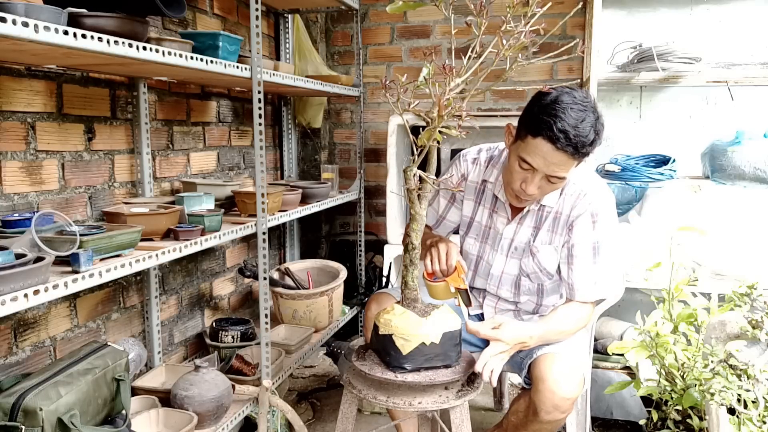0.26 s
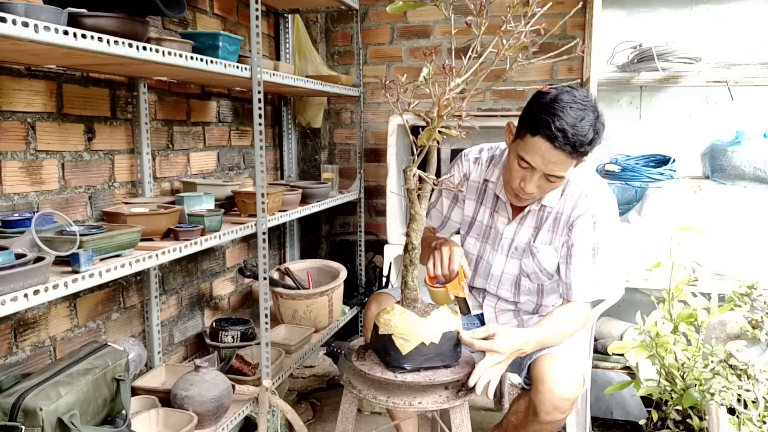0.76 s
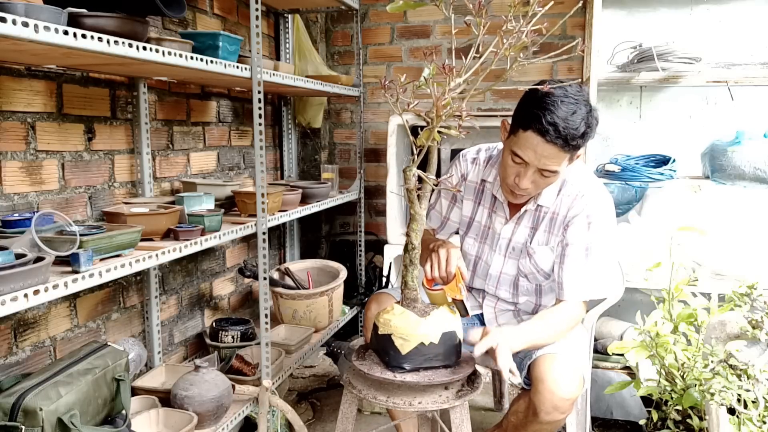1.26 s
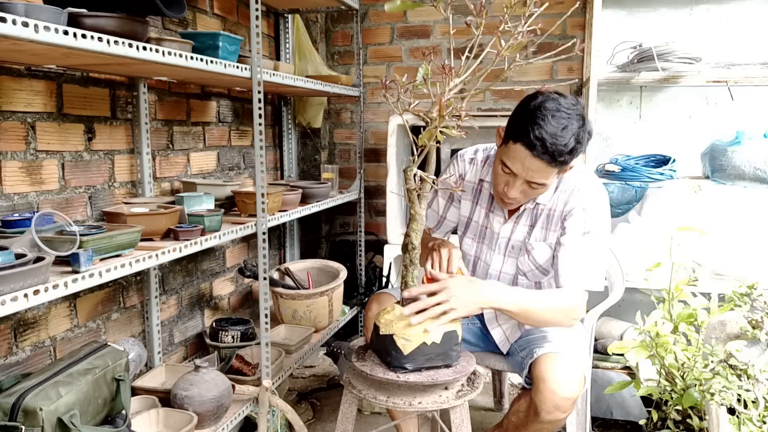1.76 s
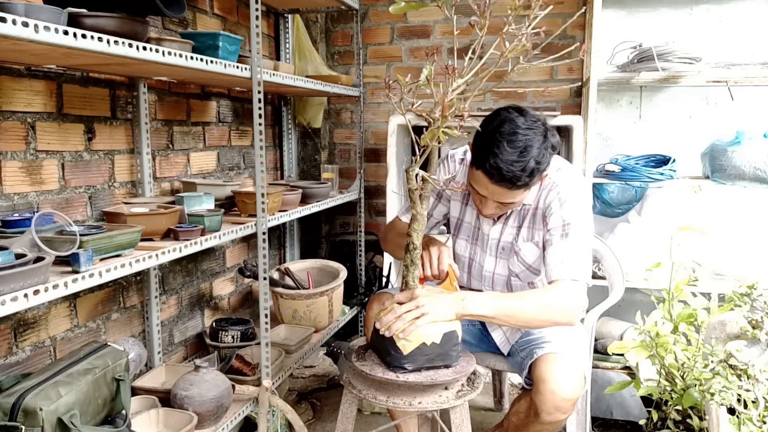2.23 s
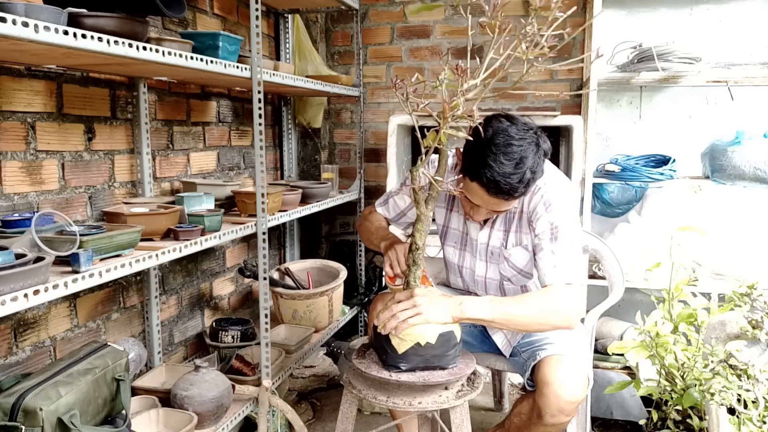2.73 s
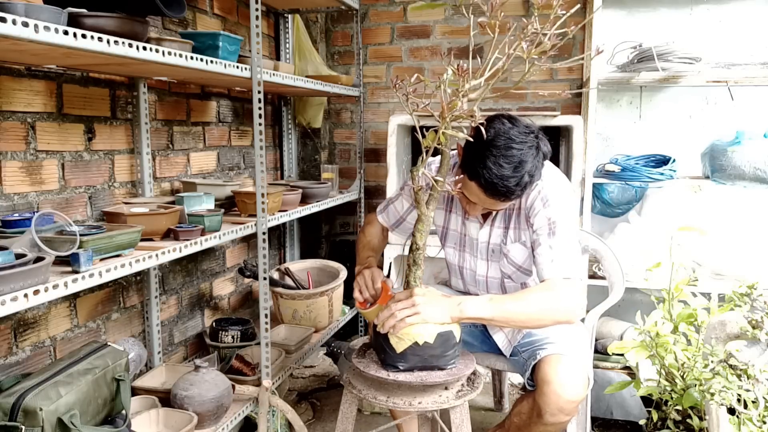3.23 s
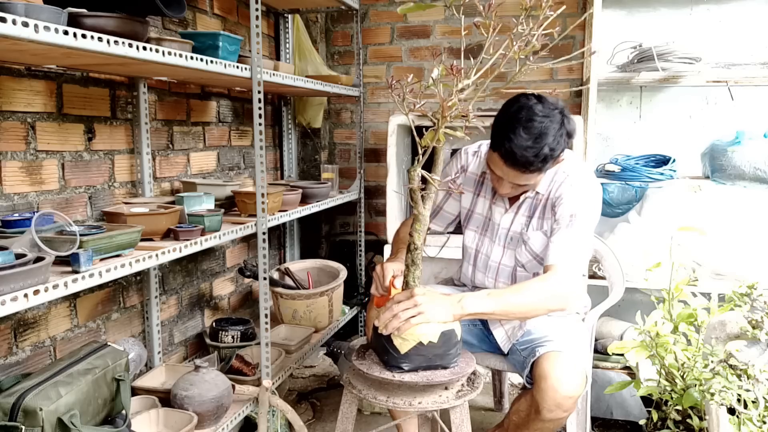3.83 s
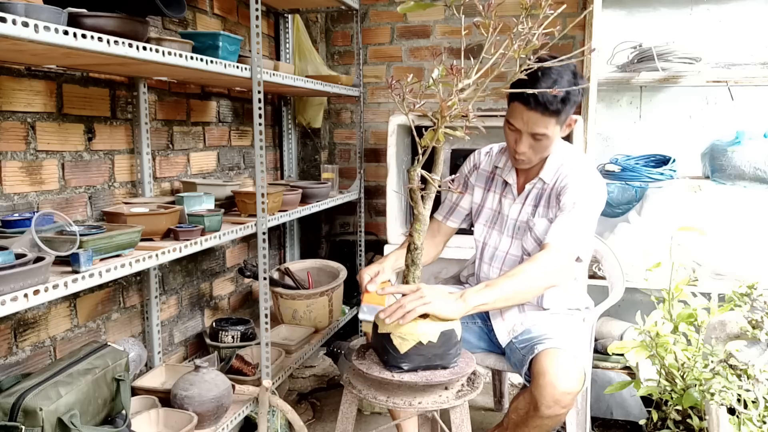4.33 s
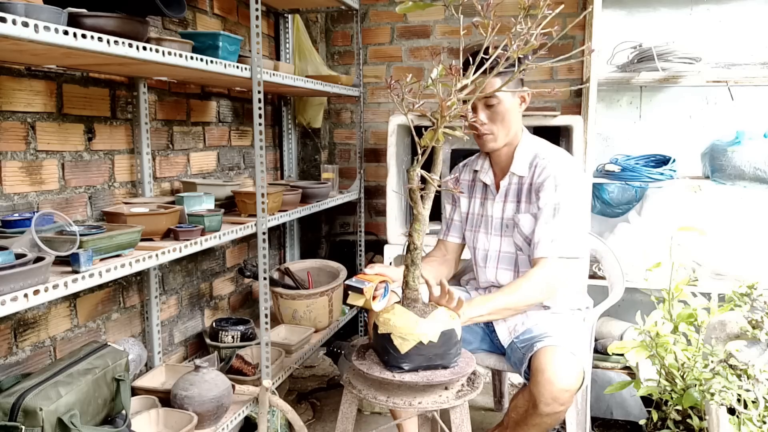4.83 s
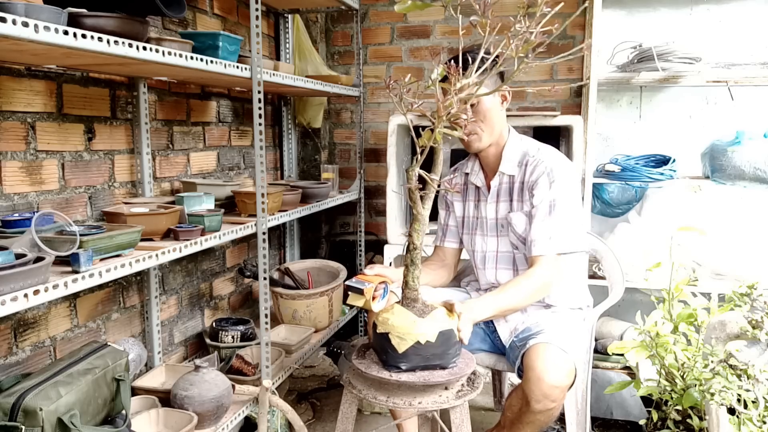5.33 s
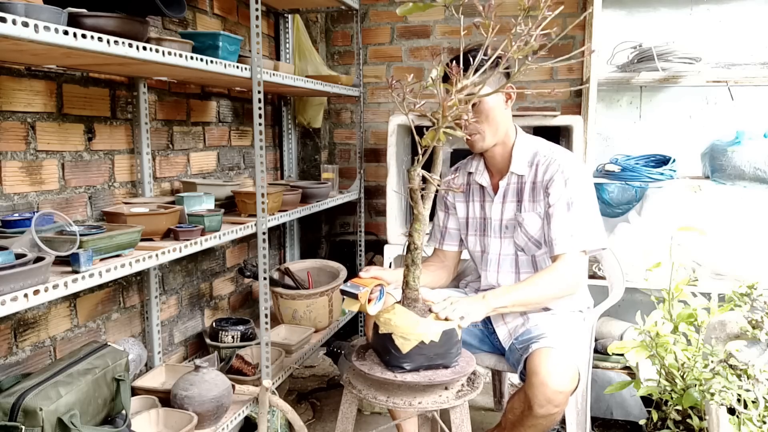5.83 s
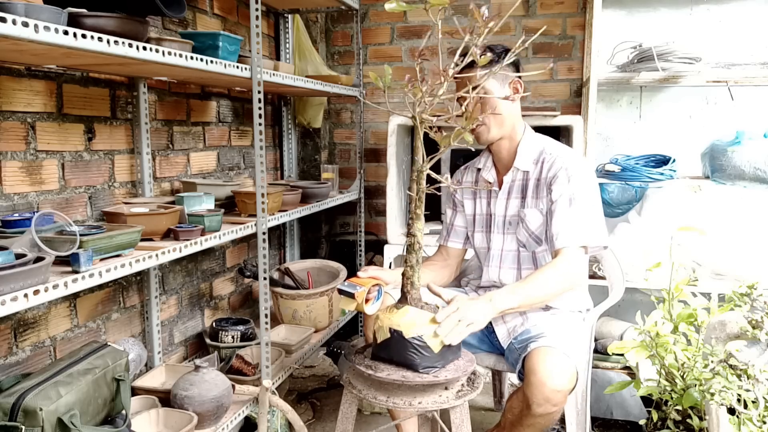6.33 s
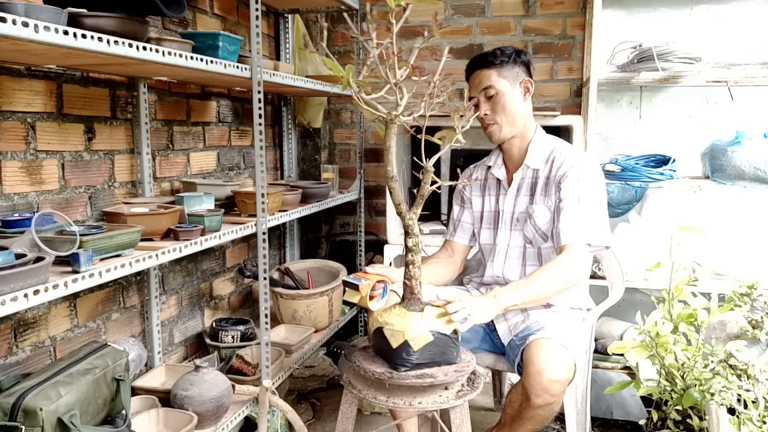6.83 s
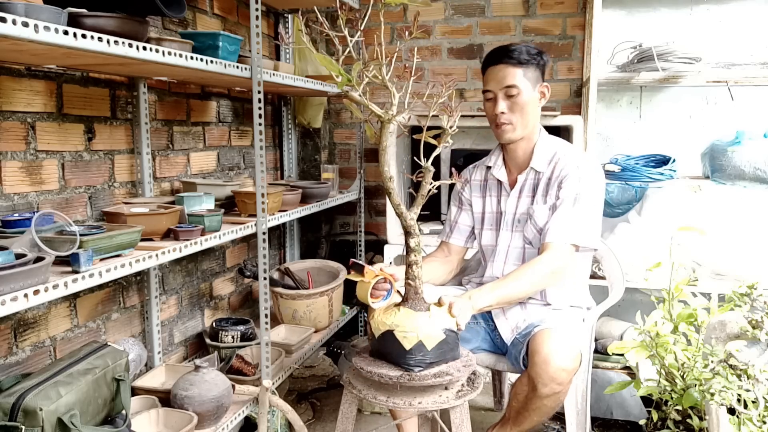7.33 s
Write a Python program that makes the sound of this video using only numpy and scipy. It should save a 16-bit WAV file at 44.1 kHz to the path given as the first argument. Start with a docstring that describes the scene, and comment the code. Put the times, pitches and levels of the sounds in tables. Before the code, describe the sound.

A short tape tug, then a loud stuttering pull of sticky tape, soft plastic crinkles, quiet bird whistles and a faint low engine.

```python
"""In a small brick shed, packing tape is pulled off a hand dispenser and wound round a plastic-wrapped root ball.
The glue lets go in jerks: each slip is a shower of tiny random snaps that rings the taut strip and the roll.
The wrap rustles and crinkles, built from dense fine snaps for the rubbing and sparser ones for crinkles and creases.
Outside, gliding sine tones make bird calls and steady ones faint far-off notes; harmonics of a firing rate make
an engine throb, with puffs and rumble of filtered noise. A soft bed of noise is the outdoor air."""
import sys
import numpy as np
from scipy import signal
from scipy.fft import rfft, irfft, next_fast_len
from scipy.io import wavfile
from scipy.ndimage import uniform_filter1d

SR = 44100
rng = np.random.default_rng(int(sys.argv[2]) if len(sys.argv) > 2 else 0)


def master(y):
    """Save y as 16-bit WAV."""
    cut = np.clip(np.atleast_2d(y).T, -1, 1)
    pcm = np.round(cut * 32767)  # scale
    wavfile.write(sys.argv[1], SR, pcm.astype(np.int16))


N = 333837
TIME = np.arange(N) / SR

# colour of roll and strip in each pull: (frequency [Hz], relative density [dB per Hz])
FIRST_PULL_COLOUR = [(60, -53), (200, -29), (450, -14), (600, -1), (720, -6.5), (880, -16), (1100, -10.5),
                     (1450, -8.5), (2000, -1.5), (2500, -9), (3700, -12), (4800, -17.5), (7500, -19),
                     (10500, -21.5), (15500, -25)]
SECOND_PULL_COLOUR = [(120, -49), (200, -16), (298, -18.5), (399, -1.5), (641, -6), (742, -2.5),
                      (1450, -12), (2470, 1), (2750, -9.5), (3680, -2), (4260, -10), (7090, -12.5),
                      (15500, -25.5)]
LONG_PULL_COLOUR = [(40, -42), (130, -20), (250, -18), (420, -14.5), (520, -12), (620, -19), (760, -3),
                    (1050, -6), (1450, -8), (1850, -2.5), (2700, 1.5), (3700, -3), (7000, -7),
                    (10000, -9.5), (15500, -15)]
LAST_PULL_COLOUR = [(80, -45.5), (250, -24), (400, -8.5), (620, -14), (1000, -13.5), (1500, -8.5),
                    (1800, -6), (2300, -9), (4500, -14.5), (7300, -6.5), (10000, -13.5), (15500, -16)]


def tape(jerks):
    """A short tug, a second one, the long pull round the root ball, a last tug; the grip damps the core in tugs."""
    first = pull("first", FIRST_PULL_COLOUR, jerks, core_db=-21.5)
    second = pull("second", SECOND_PULL_COLOUR, jerks, core_db=-11)
    long = pull("long", LONG_PULL_COLOUR, jerks, core_db=-3.0)
    last = pull("last", LAST_PULL_COLOUR, jerks, core_db=-15)
    return first + second + long + last


# stretches of steady peeling: (pull [name], start [s], stop [s], level [dB])
PEEL_STRETCHES = [("first", .192, .305, -27.5), ("second", 2.531, 2.63, -31), ("long", 2.695, 2.93, -27),
                  ("long", 2.945, 3.385, -28), ("long", 3.428, 3.445, -28), ("long", 3.482, 3.5375, -25),
                  ("last", 4.039, 4.085, -54), ("last", 4.095, 4.13, -34)]
# modes of the hollow cardboard core: (frequency [Hz], width [Hz], relative level [dB])
CORE_MODES = [(758, 97, -19.5), (833, 24, -17.5), (1074, 76, -23.5), (1780, 160, -16)]
PEEL_ATTACK_S = 0.009  # the strip takes up its tension
PEEL_RELEASE_DB_PER_S = 600  # the roll coasts to a stop
SLIP_LIFE_S = 0.0044
STRIP_FLUTTER_RAD = 0.99  # rms unsteadiness of the ringing strip's phase


def pull(name, colour, jerks, core_db, size=8192):
    """Glue threads snap steadily and in jerks; each jerk rings the strip at the pitch of its tension."""
    stretches = [row[1:] for row in PEEL_STRETCHES if row[0] == name]
    peel = np.zeros(N)
    t = TIME[:SR]
    for start, stop, db in stretches:
        onset = 1 - np.exp(-t / PEEL_ATTACK_S)
        overrun_s = np.maximum(t - (stop - start), 0)
        add(peel, start, onset * amp(db - PEEL_RELEASE_DB_PER_S * overrun_s))

    threads = snaps(per_second=7000, scatter_db=3.5)
    force = threads * peel
    flutter = STRIP_FLUTTER_RAD * wobble(600)
    strip = np.zeros(N)
    earliest, latest = stretches[0][0] - .03, stretches[-1][1] + .03
    for s, db, hz, ring_db in jerks:
        if not earliest < s < latest:
            continue
        now = slice(round(s * SR), round(s * SR) + size)
        onset_s = s - .001  # each slip starts 1 ms before its listed time
        shower = burst(SLIP_LIFE_S, rise=0.00036) * threads[now]
        add(force, onset_s, amp(db + 3) * shower)
        ring = burst(SLIP_LIFE_S, rise=0.00014) * np.sin(2 * np.pi * hz * TIME[:size] + flutter[now])
        add(strip, onset_s, amp(db + ring_db) * ring)

    core = sum(amp(db + core_db) * resonate(force, hz, width) for hz, width, db in CORE_MODES)
    no_bass = signal.butter(4, 550, "highpass", fs=SR, output="sos")  # the ringing strip and core carry no bass
    return coloured(force, colour) + signal.sosfilt(no_bass, strip + core)


# single hard jerks of the tape: (time [s], relative level [dB], strip pitch [Hz], strip ring over jerk [dB])
SINGLE_JERKS = [(.1953, -18, 2060, -6), (.2257, -17, 2299, -8), (.2316, -11.5, 2677, 1.5),
                (.2479, -12.5, 1970, -2.5), (.2773, -12.5, 1940, -2), (.2989, -17.5, 1943, 1.5),
                (2.5362, -20.5, 1876, -0.5), (2.543, -20, 1920, 2), (2.5619, -16.5, 1980, -7),
                (2.5864, -16, 2530, -3), (2.612, -17, 2440, -9.5), (2.6959, -15, 2620, 1),
                (2.7826, -15.5, 2660, -12), (3.2885, -10.5, 2410, 8), (3.3131, -10.5, 2860, -1),
                (3.3324, -14.5, 1830, -2), (3.3702, -12.5, 2860, -12.5), (3.4306, -11.5, 2230, -10.5),
                (3.482, -12.5, 2970, -13), (3.5064, -10, 2315, -12), (4.0378, -39, 3260, -3),
                (4.0995, -21.5, 1830, -12), (4.117, -25, 1760, 1)]
# under a firm pull the glue sticks and slips in a run:
# (start [s], length [s], slips [per s], relative level [dB], strip pitch [Hz], strip ring over slip [dB])
CHATTER_RUNS = [(2.831, .09, 36, -15.5, 2748, -10), (2.945, .115, 45.4, -13, 2870, -2),
                (3.0707, .11, 38.5, -11.5, 2800, 4), (3.2036, .07, 34, -9.5, 2570, -7)]
SLIP_JITTER_S, SLIP_SCATTER_DB, PITCH_SCATTER = 0.0005, 1, 0.018  # rms; pitch as a share


def slips():
    """List every slip as (s, dB, Hz, ring dB): the single jerks and the nearly regular runs of chatter."""
    rows = list(SINGLE_JERKS)
    for start, length, rate, db, hz, ring_db in CHATTER_RUNS:
        chance = rng.standard_normal((16, 3))
        for s, (late, louder, higher) in zip(np.arange(start, start + length, 1 / rate), chance):
            slip_s = s + SLIP_JITTER_S * late
            slip_db = db + SLIP_SCATTER_DB * louder
            slip_hz = hz * (1 + PITCH_SCATTER * higher)
            rows.append((slip_s, slip_db, slip_hz, ring_db))
    return rows


# creases of the wrap giving way: (time [s], level [dB], life [s])
CREASE_TIMES = [(2.219, -52, 0.014), (2.247, -40, 0.024), (2.413, -33.5, 0.013), (4.335, -59.5, 0.017),
                (4.413, -43.5, .025), (4.449, -47.5, 0.027), (4.719, -54.5, 0.037), (5.906, -49.5, .014)]
# colours of the wrap giving way, rubbed and crinkled: (frequency [Hz], relative density [dB per Hz])
GIVING_COLOUR = [(150, -29), (400, -7.5), (900, 4), (1800, 0.5), (3300, -2), (7000, -7), (15000, -14.5)]
RUB_COLOUR = [(120, -28), (200, -4.5), (503, -19.5), (610, -7), (899, -2.5), (1210, -7), (1680, -3.5),
              (2260, -13.5), (2550, -10.5), (7000, -29), (9100, -48.5), (15400, -120)]
CRINKLE_COLOUR = [(1500, -14.5), (3000, 5.5), (5500, 4), (9000, 1), (15500, -6.5)]


def wrap(rubbing, crinkling):
    """Rubbed plastic rustles, crinkles finely and gives at creases; the roll bumps as it is lifted away."""
    rub_grain = snaps(per_second=8200, scatter_db=4.5) * amp(2.0 + 0.89 * wobble(20))
    rub = coloured(rub_grain * rubbing, RUB_COLOUR)
    crinkle_grain = snaps(per_second=840, scatter_db=9.5) * amp(3.5 + 3.0 * wobble(24))
    crinkle = coloured(crinkle_grain * crinkling, CRINKLE_COLOUR)

    giving, bump = np.zeros(N), np.zeros(N)
    for s, db, life in CREASE_TIMES:
        add(giving, s, amp(db) * burst(life, rise=0.00062))
    creases = coloured(giving * snaps(per_second=1200, scatter_db=2.5), GIVING_COLOUR)

    core_tone = np.sin(2 * np.pi * CORE_MODES[0][0] * TIME[:8192])
    add(bump, 4.443, amp(-38) * burst(life=0.011, rise=0.0019) * core_tone)
    return rub + crinkle + bump + creases


# swells of rubbing, crinkle and hiss; the short one at 6.14 s is hiss let through by the suppressor
# during a whistle, written in here as a swell of its own:
# (peak time [s], swell [s], fade [s], relative rubbing [dB], relative crinkle [dB])
RUSTLE_SWELLS = [(0.601, .1, .15, -68, -68.5), (1.15, .2, 0.25, -74.5, -72.5), (1.68, .42, 0.56, -57, -74),
                 (1.705, .02, 0.023, -65.5, -64), (3.75, .1, 0.23, -66, -71.5), (4.33, .12, .1, -68, -66),
                 (4.7, .2, 0.18, -67, -66.5), (5.9, 0.76, 0.67, -81, -74), (6.14, .02, 0.0554, -75, -74)]


def rustle_swells():
    """Rubbing and crinkling strength: every swell rises and fades much like a bell curve."""
    rub, crinkle = np.zeros(N), np.zeros(N)
    for s, swell, fade, rub_db, crinkle_db in RUSTLE_SWELLS:
        shape = np.exp(-np.abs((TIME - s) / np.where(TIME < s, swell, fade)) ** 1.5)
        rub += amp(rub_db) * shape
        crinkle += amp(crinkle_db) * shape
    return rub, crinkle


# stereo spread of the work: (frequency [Hz], gain of the side signal [dB])
WORK_WIDTH = [(100, -9), (350, -2.5), (750, -12.5), (1300, -2), (3000, 1.5)]
# the work leans right, except in its highest fizz: (frequency [Hz], left gain over right [dB])
WORK_LEAN = [(100, -3.5), (350, -3), (1200, -5), (2800, -4), (5500, -2), (9000, 0), (15000, 2.5)]
# echoes of the shed's walls: (frequency [Hz], time to fall 60 dB [s])
SHED_DECAY = [(200, 0.25), (1400, 0.2), (4000, 0.24), (12000, 0.18)]
# echoes of the open yard, for the work and the birds: (frequency [Hz], time to fall 60 dB [s])
YARD_DECAY = [(500, .55), (3000, .6), (8000, .55)]


def work():
    """Strip and wrap throw different snaps at each ear on the same slips and swells; the low notes spread less."""
    jerks, swells = slips(), rustle_swells()
    left = tape(jerks) + wrap(*swells)
    right = tape(jerks) + wrap(*swells)
    mid = (left + right) / 2
    side = filtered((left - right) / 2, lambda hz: amp(along(WORK_WIDTH, hz)))
    near = np.array([mid + side, mid - side])
    shed = room(near, SHED_DECAY, tail_db=-1)
    yard = room(near, YARD_DECAY, tail_db=-22.5, count=6)
    heard = amp(-3.5) * near + shed + yard
    return filtered(heard, lambda hz: amp(np.outer([.5, -.5], along(WORK_LEAN, hz))))


# a small bird's repeated chip: (time [s], relative level [dB])
CHIP_TIMES = [(.02, -49.5), (0.916, -52), (1.59, -59), (2.498, -47.5), (4.258, -51), (4.816, -51.5),
              (5.61, -50.5), (6.428, -50), (7.208, -49)]
# course of one chip: (time after its start [s], pitch before scatter [Hz], relative level [dB])
CHIP_COURSE = [(0, 4606, -11.5), (.012, 4960, 6), (0.025, 5300, -7.5), (0.035, 4700, -7),
               (0.051, 4220, -0.5), (.07, 4000, -16)]
# a second bird's scooped whistles; the last row is a high note leading into the first bird's final chip:
# (start [s], length [s], pitch around the dip [Hz], upward glide [share of pitch], relative level [dB],
# huskiness [share of pitch])
WHISTLES = [(.53, 0.0695, 2650, 0.11, -58.5, 0.084), (0.622, .11, 2780, -.1, -60.5, 0.063),
            (0.924, 0.0614, 2700, 0.047, -56, 0.07), (1.376, 0.059, 2670, 0.003, -58.5, 0.046),
            (4.896, .09, 3350, .05, -62.5, 0.022), (5.1, .135, 2770, .06, -55.5, 0.029),
            (5.323, .165, 2440, -.13, -57, 0.026), (5.556, .18, 2290, -.16, -54.5, 0.029),
            (5.808, .19, 2220, -.13, -54.5, 0.024), (6.108, 0.13, 2110, -.06, -54.5, 0.029),
            (6.119, .075, 2910, -0.103, -63, .05), (7.183, 0.0327, 5970, 0, -57.5, .03)]
SCOOP, SCOOP_SKEW = 0.2, 0.8  # rise of both ends above the dip, as a share; a skew under 1 brings the dip early


def birds():
    """Sharp hooked chips from one bird, mostly husky whistles from another: sines with gliding, rasping pitch."""
    calls = np.zeros(N)
    at, pitch, level = np.transpose(CHIP_COURSE)
    t = TIME[:SR // 10]
    rasp = wobble(900)
    for s, db in CHIP_TIMES:
        unsteady = .012 * rng.standard_normal() + .045 * rasp[round(s * SR):][:len(t)]
        hz = np.interp(t, at, pitch) * (1 + unsteady)
        loudness = amp(db + np.interp(t, at, level, right=-120))
        add(calls, s, loudness * np.sin(2 * np.pi * np.cumsum(hz) / SR))

    # the second bird's whistles and the first bird's one high note share this shape
    for s, length, dip_hz, glide, db, husky in WHISTLES:
        u = np.linspace(0, 1, int(length * SR))  # progress through the note
        scoop = SCOOP * (2 * u ** SCOOP_SKEW - 1) ** 2
        hz = dip_hz * (1 + scoop + glide * (u - .5))
        hz = hz * (1 + husky * rasp[round(s * SR):][:len(u)])
        swell = np.sqrt(np.abs(np.sin(np.pi * u)))
        add(calls, s, amp(db) * swell * np.sin(2 * np.pi * np.cumsum(hz) / SR))

    direct = amp(-7) * calls
    return direct + room(np.array([calls, calls]), YARD_DECAY, tail_db=-2.0, count=12)


# thin far-off tones: (start [s], length [s], pitch [Hz], relative level [dB])
FAR_TONES = [(-.03, 0.23, 1510, -50.5), (0.292, 0.31, 605, -59), (6.607, 0.34, 2010, -76.5),
             (7.245, 0.31, 2029, -71), (7.296, 0.12, 984, -62), (7.338, 0.12, 1743, -67),
             (7.465, 0.16, 990, -74.5)]


def far_tones():
    """Faint held sines, slightly unsteady in level and phase."""
    out = np.zeros(N)
    for s, length, hz, db in FAR_TONES:
        gate = np.clip(np.minimum(TIME - s, s + length - TIME) / 0.046, 0, 1)
        waver = amp(1.8 * wobble(25)) * np.sin(2 * np.pi * hz * TIME + .5 * wobble(40))
        out += amp(db - 3.0) * gate * waver
    return out


# speed of the engine: (time [s], firings before a slight waver [per s])
ENGINE_SPEED = [(0, 24), (1.4, 25.7), (1.85, 24), (1.98, 22.7), (2.15, 24.6), (2.55, 22), (3.7, 24.2),
                (5.5, 24.7), (7.57, 29)]
# its lowest orders, and its upper ones: (multiple of the firing rate, relative level [dB])
BOOM_ORDERS = [(3, 4.5), (4, -5.5)]
DRONE_ORDERS = [(4, -11.5), (5, 3), (6, -6), (7, -12)]
# the lowest orders boom when it is nearest: (time [s], relative level [dB])
BOOM_SWELL = [(0, -74), (1.35, -70.5), (1.85, -54), (1.95, -38), (2.1, -40), (2.55, -50), (2.7, -56.5),
              (3.9, -66.5), (4.7, -65.5), (5.1, -82)]
# the upper orders swell past and recede: (time [s], relative level [dB])
DRONE_SWELL = [(0, -80), (.45, -77), (.65, -62.5), (1.18, -60.5), (1.65, -46.5), (2.2, -52.5), (3.3, -56),
               (4.0, -65), (5.05, -67), (5.8, -61), (6.4, -72), (7.57, -66.5)]
RUMBLE_DB, RUMBLE_FOLLOWS = -63, 0.4  # mean relative level; dB of rumble for each dB of boom


def engine():
    """The low orders of a distant exhaust come through the walls, with dull puffs and a soft rumble."""
    firing_hz = curves(ENGINE_SPEED)[0] * (1 + .005 * wobble(6))
    turn = 2 * np.pi * np.cumsum(firing_hz) / SR
    boom_db, drone_db = curves(BOOM_SWELL)[0], curves(DRONE_SWELL)[0]
    rumble_db = RUMBLE_DB + RUMBLE_FOLLOWS * (boom_db - boom_db.mean())

    def stack(orders):
        """Sum the orders, each drifting in level and phase."""
        return unit(sum(amp(db + 1.4 * wobble(6.5)) * np.sin(k * turn + .4 * wobble(10)) for k, db in orders))

    rumble = unit(resonate(rng.standard_normal(N), hz=47, width_hz=8.9, size=8192))
    pulsing = rng.standard_normal(N) * (1 + 0.7 * np.cos(turn))  # one puff a firing
    puff_colour = [(40, -10), (100, 0.5), (220, -12.5), (400, -16.5), (900, -28), (3000, -70)]  # (Hz, dB per Hz)
    puffs = unit(coloured(pulsing, puff_colour))
    boom = amp(boom_db) * (stack(BOOM_ORDERS) + amp(-17) * puffs)
    drone = amp(drone_db) * (stack(DRONE_ORDERS) + amp(-13) * puffs)
    return boom + drone + amp(rumble_db) * rumble


# colour of the outdoor air: (frequency [Hz], relative density [dB per Hz])
AIR_COLOUR = [(20, -5.5), (60, -0.5), (140, 3), (210, -8), (420, -14), (700, -16), (2000, -15), (8000, -18),
              (15500, -19)]
# how alike the air is in both ears: (frequency [Hz], left-right likeness [0 to 1])
AIR_LIKENESS = [(60, 0.29), (200, 0.59), (600, 0.47), (2000, .05)]


def air():
    """Outdoor murk and faint hiss: filtered noise, partly alike in both ears in the lows, hardly in the treble."""
    def mid_and_side(hz):
        """Split the colour between mid and side so the ears get the listed likeness."""
        angle = np.arccos(np.clip(along(AIR_LIKENESS, hz), -1, 1)) / 2
        return amp(along(AIR_COLOUR, hz)) * [np.cos(angle), np.sin(angle)]

    mid, side = filtered(rng.standard_normal((2, N)), mid_and_side)
    return amp(-64.0) * unit(np.array([mid + side, mid - side]))


def room(x, decay, tail_db, count=44):
    """Diffuse echoes of a stereo sound; the source moves, so each moment meets new reflections."""
    hop = N // count
    out = np.zeros((2, N + hop))
    fade = np.sin(np.pi * (np.arange(2 * hop) + .5) / (2 * hop))
    padded = np.pad(x[::-1], ((0, 0), (hop, 2 * hop)))  # walls throw each side across to the other
    for start in range(0, N, hop):
        wet = signal.fftconvolve(padded[:, start:start + 2 * hop] * fade, tail(decay), axes=1)
        for ear, sound in zip(out, wet):
            add(ear, start / SR, sound)
    return amp(tail_db) * out[:, hop:hop + N]


def tail(decay):
    """A diffuse echo of energy 1 for each ear; each frequency dies at its own speed."""
    hz, t, z = signal.stft(rng.standard_normal((2, SR // 2)), SR, nperseg=256)
    fall = amp(-60 * t / along(decay, hz)[:, None])
    echo = signal.istft(z * fall, SR, nperseg=256)[1]
    return echo / np.linalg.norm(echo, axis=1, keepdims=True)


def snaps(per_second, scatter_db):
    """Random tiny impulses of uneven size, rms 1."""
    fires = rng.random(N) < per_second / SR
    sign = np.sign(rng.standard_normal(N))
    size = amp(scatter_db * np.clip(rng.standard_normal(N), -2, 2))
    return unit(fires * sign * size)


def burst(life, rise, size=8192):
    """An envelope that jumps up and dies away."""
    t = TIME[:size]
    return (1 - np.exp(-t / rise)) * np.exp(-t / life)


def resonate(x, hz, width_hz, size=2048):
    """Ring one damped mode of energy 1."""
    t = TIME[:size]
    kernel = np.sin(2 * np.pi * hz * t) * np.exp(-np.pi * width_hz * t)
    return signal.oaconvolve(x, kernel / np.linalg.norm(kernel))[:len(x)]


def coloured(x, spectrum, size=4096):
    """A causal filter of energy 1 with the given spectrum."""
    gain = amp(along(spectrum, np.fft.rfftfreq(size, 1 / SR)))
    cepstrum = irfft(np.log(gain + 1e-6))
    cepstrum[1:size // 2] *= 2  # folding the cepstrum gives minimum phase
    cepstrum[size // 2 + 1:] = 0
    kernel = irfft(np.exp(rfft(cepstrum)))
    return signal.oaconvolve(x, kernel / np.linalg.norm(kernel))[:len(x)]


def filtered(x, response):
    """Multiply the spectrum of x by a response of frequency."""
    m = next_fast_len(N + SR // 2)
    return irfft(rfft(x, m) * response(np.fft.rfftfreq(m, 1 / SR)), m)[..., :N]


def wobble(rate):
    """A smooth random curve of rms 1 that turns about rate times a second."""
    real, imaginary = rng.standard_normal((int(N / SR * rate / 2) + 2, 2)).T
    return unit(irfft(real + 1j * imaginary, next_fast_len(N, True))[:N])


def curves(rows):
    """One value per sample for each column after the time."""
    s, *columns = np.transpose(rows)
    return [np.interp(TIME, s, column) for column in columns]


def along(points, hz):
    """Read (Hz, value) points on a log frequency axis."""
    f, v = np.transpose(points)
    return np.interp(np.log(hz + 1), np.log(f + 1), v)


def add(track, s, sound):
    """Mix a sound into a track at time s."""
    part = track[max(round(s * SR), 0):][:len(sound)]
    part += sound[:len(part)]


def amp(db):
    """Decibels to gain."""
    return 10 ** (np.asarray(db) / 20)


def unit(x):
    """Scale to rms 1."""
    return x / np.sqrt(np.mean(x ** 2) + 1e-20)


def rightwards(db):
    """Left and right gains that lean a sound to the right by db."""
    return amp(db * np.array([[-.5], [.5]]))


def scene():
    """The work sits to the right among close hard walls; the open side of the shed is further right."""
    calls = rightwards(db=13.5) * (birds() + far_tones())
    background = rightwards(db=4.0) * (engine() + air())
    return work() + calls + background


QUIET_DB, SUPPRESS_DB = -56, 5  # treble level where it starts to act; deepest cut
SUPPRESS_SLOPE, SUPPRESS_S = 0.33, 0.06  # dB of cut per dB below; averaging time [s]


def suppress(x):
    """A noise suppressor turns all but the bass down a little whenever the treble is quiet."""
    upper = filtered(x, lambda hz: along([(200, 0), (500, 1)], hz))
    treble = filtered(x, lambda hz: hz > 2000)
    power = uniform_filter1d(np.mean(treble ** 2, axis=0), int(SUPPRESS_S * SR))
    level_db = 10 * np.log10(np.abs(power) + 1e-14)
    gain = amp(np.clip(SUPPRESS_SLOPE * (level_db - QUIET_DB), -SUPPRESS_DB, 0))
    return x + (gain - 1) * upper


TOP_HZ = 15900  # band limit


def record(dry):
    """The recorder suppresses faint hiss, rounds off the highest peaks and keeps nothing above its band limit."""
    quietened = suppress(dry)
    rounded = quietened / (1 + np.abs(quietened / .9) ** 6) ** (1 / 6)
    return filtered(rounded, lambda hz: hz < TOP_HZ)


dry = scene()
out = record(dry)
master(out)
```